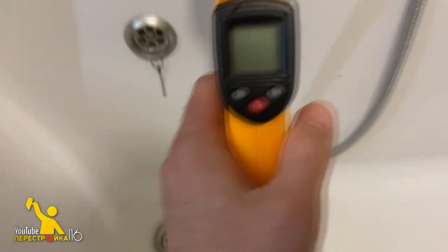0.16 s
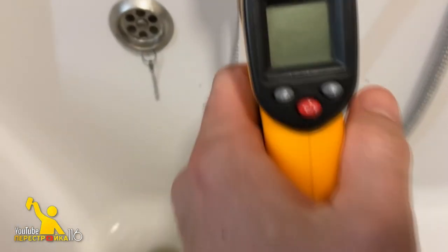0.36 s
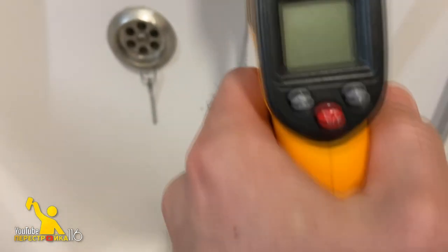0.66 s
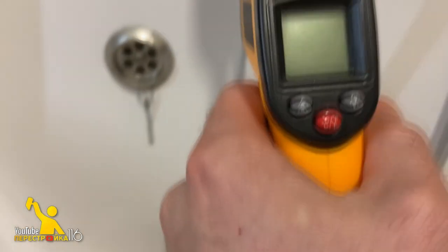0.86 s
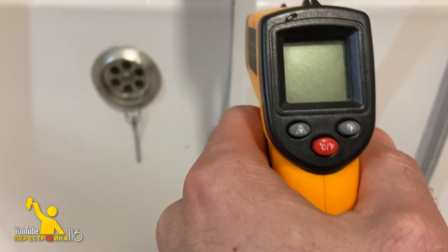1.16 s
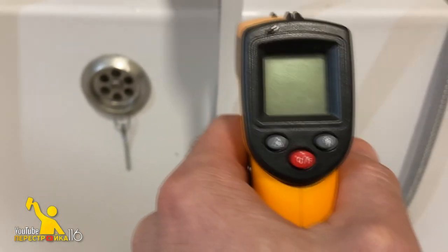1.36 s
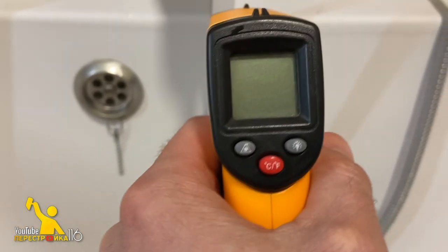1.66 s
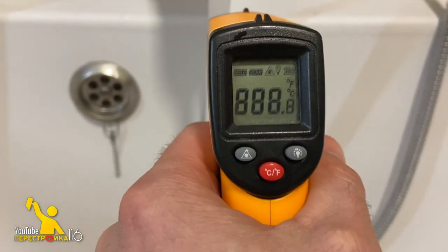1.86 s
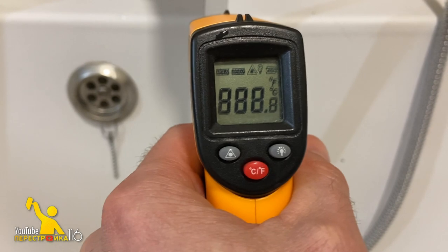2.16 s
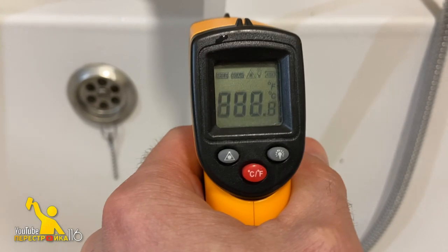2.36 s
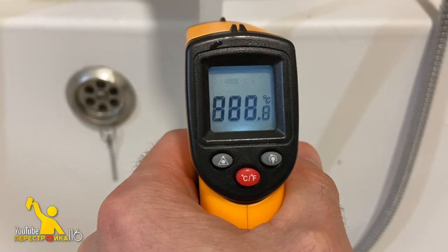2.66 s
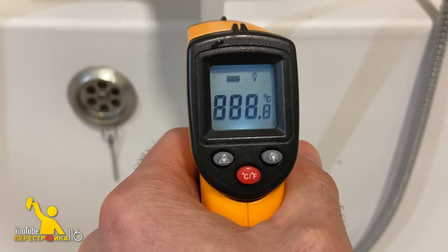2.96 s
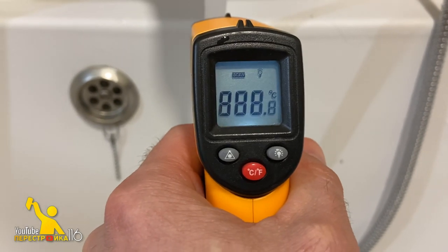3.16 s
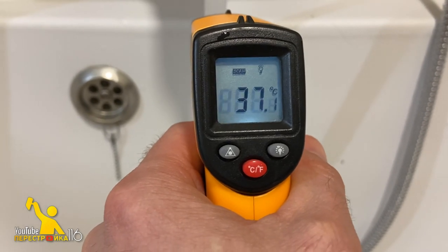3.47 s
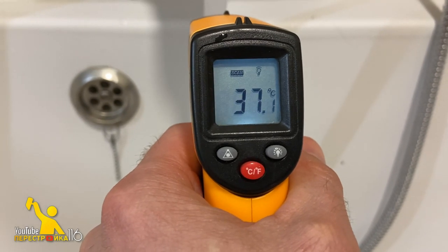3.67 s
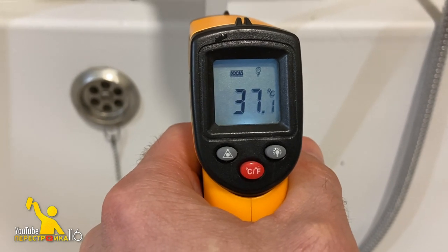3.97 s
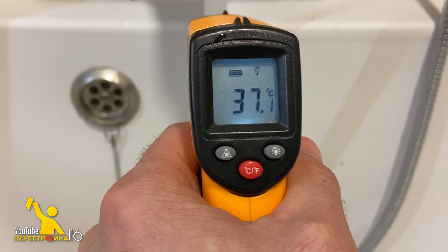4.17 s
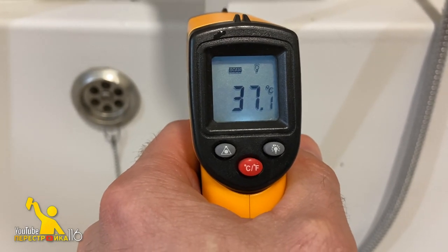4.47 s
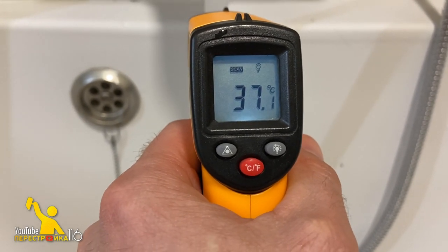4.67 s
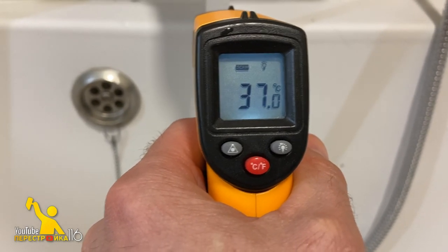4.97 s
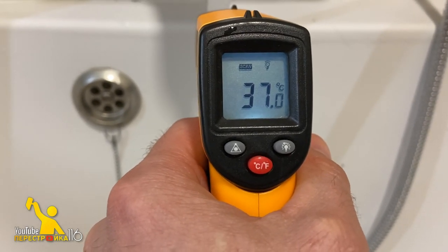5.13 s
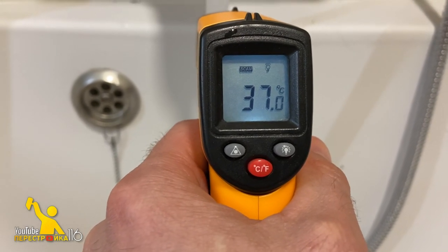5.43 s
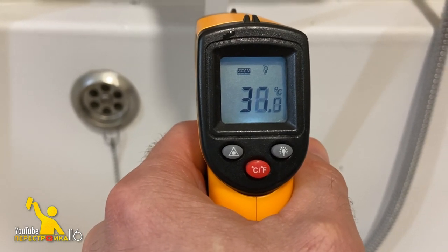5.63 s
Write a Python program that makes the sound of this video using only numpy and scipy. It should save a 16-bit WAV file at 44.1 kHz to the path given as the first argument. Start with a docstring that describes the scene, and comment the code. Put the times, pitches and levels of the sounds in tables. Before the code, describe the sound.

Constant water stream splatters in a bathtub at close range, crisp and fizzy, with a few dull handling thumps on the microphone early on.

```python
"""A mixer tap runs steadily into an empty bathtub, close to a hand-held stereo microphone.
The jet is random clicks: broad drop impacts and bubbles ringing in narrow bands, echoed by the tub walls.
Longer-ringing bubbles, short drop pings, bursts of spray and short swells of fizz stand out.
Noise drives the low modes of the tub shell, which drums softly under the stream.
Early on the hand bumps the microphone: dull decaying tones with a rubbing rumble, and one tick of the case."""
import sys
import numpy as np
from scipy import signal
from scipy.fft import rfft, irfft, next_fast_len
from scipy.io import wavfile

SR = 44100
rng = np.random.default_rng(int(sys.argv[2]) if len(sys.argv) > 2 else 0)


def wrap_up_sound(samples):
    """Save the sound to the file named by the first command line argument, as 16-bit audio."""
    columns = np.atleast_2d(samples).T
    # keep every value between -1 and 1, then stretch to whole-number steps
    tamed = np.clip(columns, -1, 1)
    steps = np.round(tamed * 32767).astype(np.int16)
    wavfile.write(sys.argv[1], SR, steps)


N = 255780  # length of the scene in samples
TIME = np.arange(N) / SR  # s
FFT_SIZE = next_fast_len(N + SR // 2)  # leaves room for half a second of echoes
BIN_HZ = np.maximum(np.arange(FFT_SIZE // 2 + 1) * SR / FFT_SIZE, 1)
# edges and middles of the bands in which the bubbles ring (Hz)
BAND_EDGES = np.concatenate([[150, 700, 1300], np.geomspace(1900, 17000, 14)])
BAND_HZ = np.sqrt(BAND_EDGES[1:] * BAND_EDGES[:-1])
# turns one signal into the opposite-sided part of left and right
LEFT_RIGHT = np.array([[1], [-1]])


def from_db(db):
    """Turn decibels into a gain."""
    return 10 ** (np.asarray(db) / 20)


def rms_one(x):
    """Scale to an rms (average strength) of 1."""
    return x / np.sqrt(np.mean(x ** 2) + 1e-20)


def at_hz(points, hz):
    """Read a table between its points, with frequency on a log axis."""
    f, value = np.transpose(points)
    return np.interp(np.log(hz), np.log(f), value)


def flutter(per_s):
    """Random ups and downs around 0, with per_s new random values a second joined by straight lines."""
    knots = rng.standard_normal(4096)
    return np.interp(TIME * per_s, np.arange(len(knots)), rms_one(knots))


def band_pass(x, order, low_hz, high_hz):
    """Keep what lies between two frequencies."""
    return signal.sosfilt(signal.butter(order, [low_hz, high_hz], "band", fs=SR, output="sos"), x)


def resonate(x, hz, width_hz):
    """Ring at one frequency, as a two-pole resonance with gain 1 on top."""
    r = np.exp(-np.pi * width_hz / SR)
    top = np.array([1, 0, -1]) * (1 - r * r) / 2
    bottom = [1, -2 * r * np.cos(2 * np.pi * hz / SR), r * r]
    return signal.lfilter(top, bottom, x + 1e-18)


def grains(spread_db, largest, count):
    """Clicks at random moments, many small and a few large; rms 1."""
    when, size, sign = rng.random((count, 3)).T
    loudness_db = spread_db * np.minimum(-np.log(1 - size), largest)
    height = from_db(loudness_db) * np.sign(sign - .5)
    return rms_one(np.bincount((when * N).astype(int), height, N))


def splash_spot(levels, surge_db, patchy_db):
    """One patch of the splash: broad drop impacts, and bubbles that come in clumps and ring in narrow bands."""
    # strength of the bubbles differs most around 2.8 kHz, less below and above: f/Hz, spread/dB
    uneven = [(1000, 4), (2800, 6), (4800, 4.5), (8000, 3.5)]
    impacts = grains(spread_db=3.8, largest=5.3, count=12000)
    out = 0
    for low, high, hz, level in zip(BAND_EDGES, BAND_EDGES[1:], BAND_HZ, levels):
        clumps = from_db(patchy_db * flutter(per_s=30))
        bubbles = grains(spread_db=at_hz(uneven, hz), largest=5.457, count=5500) * clumps
        # share of bubbles in the mix; impacts make up the rest: f/Hz, share 0-1
        share = np.clip(at_hz([(1000, 0.997), (3000, 0.59), (5000, 0.722), (11000, 0.748)], hz), 0, 1)
        mix = np.sqrt(share) * bubbles + np.sqrt(1 - share) * impacts
        out = out + band_pass(level * mix, 2, low, high)
    return out * from_db(surge_db)


def stream_levels():
    """Gain in time of each band: it follows the flow and wanders together with its neighbours."""
    # swing of the stream's strength, before each band takes its share: t/s, level/dB
    flow = [(0, -1), (.4, -0.1), (.72, 0.65), (1.15, 0), (1.85, -.5), (2.7, .5), (2.92, -0.51),
            (3.15, 0.37), (4.15, 0.31), (4.4, -0.34), (4.8, 0.06), (5.05, -0.56), (5.8, 0.16)]
    # how bubbles of each size answer: f/Hz, share of the flow's swing, chance wander/dB
    response = [(1510, 0.226, 0.38), (2200, 1, 1.14), (4500, 1, .5), (10000, 0.81, 0.31)]
    flow_db = np.interp(TIME, *np.transpose(flow))
    hz, *columns = np.transpose(response)
    follows, wander_db = [np.interp(np.log(BAND_HZ), np.log(hz), c) for c in columns]
    # one chance per band edge, so that neighbouring bands share one
    chance = [flutter(per_s=7) for _ in BAND_EDGES]
    levels = []
    for follow, wander, below, above in zip(follows, wander_db, chance, chance[1:]):
        wandering_db = wander * (below + above) / np.sqrt(2)
        levels.append(from_db(follow * flow_db + wandering_db))
    return levels


def plinks(spread_db, cycles, glide, count=900):
    """Single bubbles ring on above the hiss, each rising a little in pitch as it nears the surface."""
    age, out = TIME[:SR // 12], np.zeros(N + SR)
    for when, pitch, size, length in rng.random((count, 4)):
        hz = 1800 * 4 ** pitch  # starting pitch, spread over two octaves
        life = cycles * (.5 + length) / hz  # time to fall by 60 dB (s)
        phase = 2 * np.pi * hz * age * (1 + glide * age / life)
        ring = np.sin(phase) * np.exp(-np.log(1000) * age / life)
        at = int(when * N)
        out[at:at + len(age)] += from_db(spread_db * min(-np.log(1 - size), 4)) * ring
    return from_db(-40.5) * rms_one(out[:N])


def patter():
    """Heavier drops, a few hundred a second, land a little left or right and ring the tub floor briefly."""
    # short rings of the tub floor: f/Hz, width/Hz, relative level/dB
    floor_rings = [(3250, 330, -4), (4520, 240, 0), (4770, 260, -2), (6300, 600, -10)]
    drops = grains(spread_db=2.4, largest=3.5, count=1800)
    drops = drops * (1 + .5 * rng.standard_normal(N) * LEFT_RIGHT)
    return rms_one(sum(from_db(db) * resonate(drops, hz, width) for hz, width, db in floor_rings))


def splats(decay_s):
    """A larger lump of water lands as a brief burst of spray: noise that dies away."""
    # single loud landings: t/s, level before the splash colour/dB
    landings = [(0.166, -20), (0.7027, -18), (0.7321, -13), (0.8743, -18), (0.9079, -18), (0.9671, -19),
                (2.6478, -18), (4.789, -19)]
    out = np.zeros(N)
    for s, db in landings:
        age = TIME[:SR // 20]
        burst = rng.standard_normal(len(age)) * np.exp(-age / decay_s)
        out[int(s * SR):int(s * SR) + len(age)] += from_db(db) * burst
    return out


def tub_echoes(tub_t60, room_t60, room_db):
    """Response at each port: dense quick echoes of the tub walls, then the tiled room, as fading noise."""
    t = TIME[:SR // 2]
    tub_decay = from_db(-60 * t / tub_t60)
    room_decay = from_db(room_db - 60 * t / room_t60)
    # the first echo takes a moment to return
    echoes = rng.standard_normal((2, len(t))) * np.hypot(tub_decay, room_decay) * (t > .0008)
    return rfft(echoes / np.sqrt(np.sum(echoes ** 2, axis=1, keepdims=True)), FFT_SIZE)


def at_ports(sources):
    """Each source arrives straight, out of step between the ports, and again by its own echoes."""
    # colour of the splash: f/Hz, relative level/dB
    colour = [(300, -23.5), (800, -15), (1220, -12.5), (1500, -16), (1800, -10.5), (2100, -6), (2650, -5),
              (3200, 1.2), (3950, -1.05), (4600, 0.5), (6100, 2.02), (7000, -0.5), (11000, -4),
              (15500, -6.5)]
    # share of the splash power that arrives straight, alike at both ports: f/Hz, share 0-1
    alike_share = [(200, .7), (500, .25), (2000, .3), (3200, .38), (4500, .45), (5400, .35), (6900, .35),
                   (8000, .65), (9000, .96), (15000, .96)]
    # phase by which the left port leads: f/Hz, phase/radians
    port_phase = [(200, 0), (3200, .7), (4500, .4), (4950, .9), (5500, 3.2), (6300, 5.9), (6900, 6.6),
                  (9080, 3.14), (15500, -6.28)]
    alike = np.clip(at_hz(alike_share, BIN_HZ), 0, 1)
    lead = np.interp(BIN_HZ, *np.transpose(port_phase))
    straight = np.sqrt(alike) * np.exp(-1j * lead * np.array([[0], [1]]))
    heard = 0
    for x in sources:
        echoes = tub_echoes(tub_t60=.08, room_t60=.4, room_db=-16)
        heard = heard + rfft(x, FFT_SIZE) * (straight + np.sqrt(1 - alike) * echoes)
    colour_gain = rms_one(from_db(at_hz(colour, BIN_HZ)))
    return irfft(heard * colour_gain, FFT_SIZE)[:, :N]


def water(count=5):
    """Several patches of splash surge together with the jet and ring in the hollows of the tub."""
    # resonances of the splash in the tub: f/Hz, width/Hz, level over the hiss at full nearness/dB
    hollows = [(682, 25, -4.5), (1300, 50, -3.3), (1680, 30, -5.3), (2205, 25, -11.0), (2330, 25, -12.5),
               (2498, 30, -2.2), (2720, 22, 1.0), (2930, 18, -8.4), (3138, 22, -3.9), (3339, 40, -7.8),
               (3398, 20, -3.7), (3534, 20, -2.7), (4250, 70, -5.4), (4470, 60, -1.0), (4650, 400, -8.3),
               (4783, 22, -5.5), (6135, 40, -11.7), (6478, 25, -11.5)]
    # the microphone moves in over the tub, and resonances and patter come up: t/s, strength 0-1
    nearness = [(0, 0.43), (.25, 0.4), (.5, 1), (1, 0.99), (5.8, 1)]
    surge_db = .4 * flutter(per_s=10) + .35 * flutter(per_s=35) + .45 * flutter(per_s=140)
    near = np.interp(TIME, *np.transpose(nearness))
    levels = stream_levels()
    spot_gain = from_db(-24.5) / np.sqrt(count)  # shares the splash level among the patches
    spots = [spot_gain * splash_spot(levels, surge_db, patchy_db=1.3) for _ in range(count)]
    bubbles = plinks(spread_db=2.6, cycles=100, glide=.015)
    hiss = at_ports(spots + [splats(decay_s=0.003), bubbles])
    rings = sum(from_db(db) * resonate(hiss, hz, width) for hz, width, db in hollows)
    return hiss + near * (rings + from_db(-37.0) * patter())


def shell(side_db):
    """The jet drums on the tub floor and keeps its low modes ringing: noise through resonances."""
    # modes of the tub shell: f/Hz, width/Hz, relative level/dB
    shell_modes = [(53.3, 6.8, -13.5), (78.5, 19.4, -0.5), (135.7, 6, -16.5), (176.75, 12.1, -6.5),
                   (194.85, 6.1, -9), (223.5, 5.2, -26), (368.2, 10.6, -15), (414, 35.4, -15)]
    # the microphone drifts through the tub's standing waves: t/s, deep modes/dB, upper modes/dB
    drumming = [(0, 2, 6.5), (1.3, 2.5, 6.5), (2.6, 2.5, 2.5), (3.8, 3, 1.5), (5.8, 3, -0.5)]
    push = rng.standard_normal(N) + from_db(side_db) * rng.standard_normal(N) * LEFT_RIGHT
    # the two deepest modes fade and grow together, and so do the upper ones
    s, *columns = np.transpose(drumming)
    deep, upper = [np.interp(TIME, s, from_db(c)) for c in columns]
    drum = 0
    for hz, width, db in shell_modes:
        strength = deep if hz < 110 else upper
        drum = drum + from_db(db) * strength * rms_one(resonate(push, hz, width))
    return from_db(-51.5) * rms_one(band_pass(drum, 2, 42, 450))


def fizz_swells(side_db):
    """Short swells of fizz around one pitch: random clicks through two resonances in a row."""
    # the early 6.6 kHz one is a brighter opening, with the microphone elsewhere:
    # t at the middle/s, level/dB, f/Hz, length of the swell (bell-curve spread)/s
    swell_list = [(0.2, -35.5, 2470, 0.034), (0.25, -32, 6620, .06), (0.363, -32.5, 3600, .03),
                  (0.523, -35, 3350, 0.031), (.91, -39, 2160, .03), (2.72, -41, 2300, 0.092),
                  (3.85, -36, 2410, 0.0257), (4.069, -33, 3050, 0.073), (4.123, -38, 2150, 0.032),
                  (5.262, -37, 2466, 0.045)]
    out = np.zeros((2, N))
    mid, side = [grains(spread_db=3.5, largest=4.6, count=5000) for _ in range(2)]
    fizz = mid + from_db(side_db) * side * LEFT_RIGHT
    for s, db, hz, length in swell_list:
        width = .09 * hz  # width of each resonance (Hz)
        span = slice(max(int((s - .25) * SR), 0), int((s + .25) * SR))
        pitched = rms_one(resonate(resonate(fizz[:, span], hz, width), hz, width))
        out[:, span] += from_db(db) * pitched * np.exp(-((TIME[span] - s) / length) ** 2 / 2)
    return out


def swell(age, rise_s, t60_s):
    """Envelope that rises, then dies away by 60 dB in t60_s."""
    rise = np.sqrt(np.minimum(age / rise_s, 1))
    return rise * from_db(-60 * np.maximum(age - rise_s, 0) / t60_s)


def bumps(pan_db, rub_db, rub_hz):
    """Each shift of the grip gives the same dull thud, and a longer rumble of skin rubbing on the case."""
    # bumps of the hand on the microphone: t/s, level before panning/dB
    grip_shifts = [(.235, -45), (.3, -44), (0.624, -20.5), (.88, -33)]
    rub = rms_one(band_pass(rng.standard_normal(N), 3, 35, rub_hz))
    out = 0
    for s, db in grip_shifts:
        age = np.maximum(TIME - s, 0)
        thud = swell(age, rise_s=0.0258, t60_s=0.174) * np.sin(2 * np.pi * 79.1 * age)
        rumble = from_db(rub_db) * swell(age, rise_s=0.048, t60_s=.42) * rub
        out = out + from_db(db) * (thud + rumble)
    return out * from_db(np.array([[.5], [-.5]]) * pan_db)


def case_tick():
    """The case ticks once as the grip tightens: a small, quickly damped tone."""
    # t/s, level/dB, f/Hz, time to fall by 60 dB/s
    case_knock = (1, -36.5, 328.5, 0.0028)
    s, db, hz, t60 = case_knock
    age = np.maximum(TIME - s, 0)
    return from_db(db) * swell(age, rise_s=.001, t60_s=t60) * np.sin(2 * np.pi * hz * age)


def scene():
    """Add up splash, swells of fizz, drumming tub and handling."""
    handling = bumps(pan_db=-3.5, rub_db=-5.5, rub_hz=104.4) + case_tick()
    return water() + fizz_swells(side_db=-4.5) + shell(side_db=-11.5) + handling


def record(dry):
    """The microphone drops the deepest rumble; the top is cut steeply."""
    thinned = signal.sosfilt(signal.butter(3, 30, "high", fs=SR, output="sos"), dry)
    return signal.sosfilt(signal.ellip(10, .2, 80, 15650, fs=SR, output="sos"), thinned)


dry = scene()
out = record(dry)
wrap_up_sound(out)
```